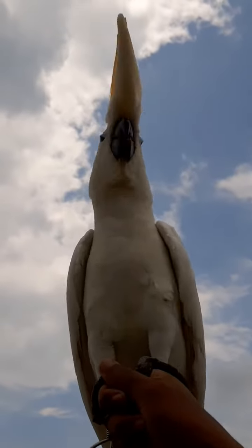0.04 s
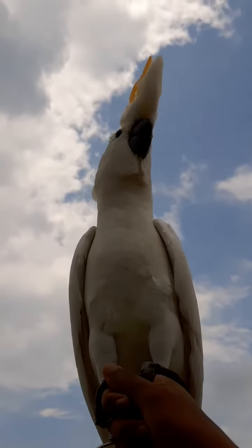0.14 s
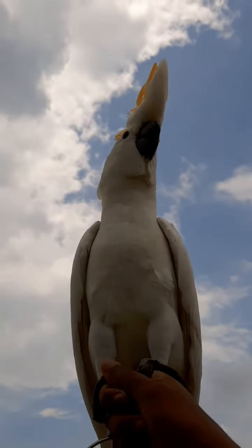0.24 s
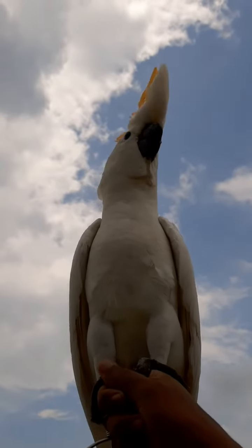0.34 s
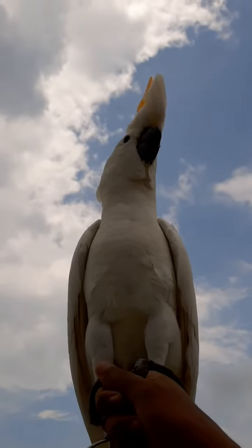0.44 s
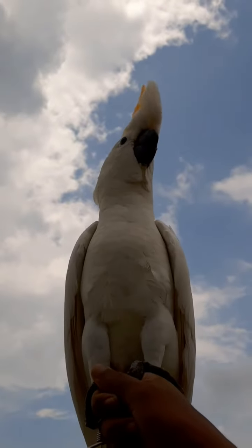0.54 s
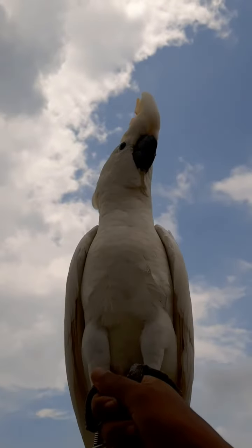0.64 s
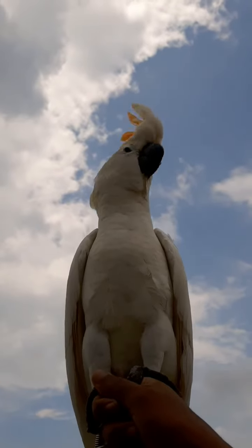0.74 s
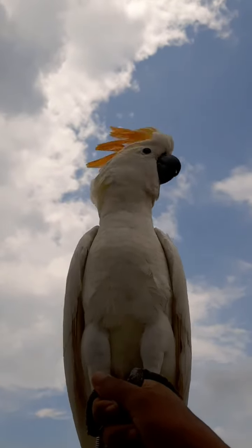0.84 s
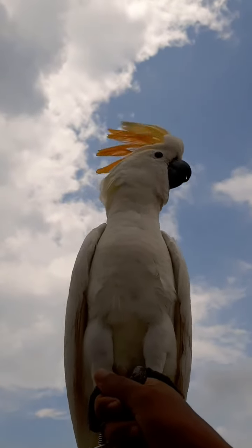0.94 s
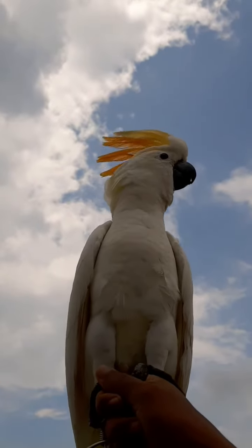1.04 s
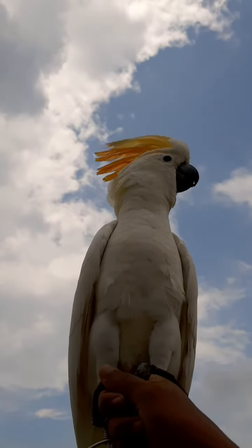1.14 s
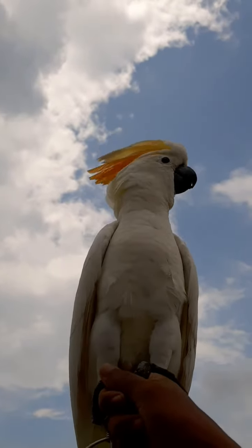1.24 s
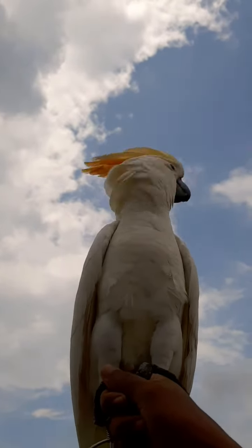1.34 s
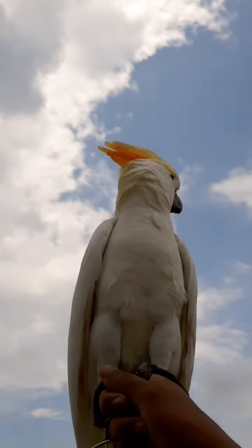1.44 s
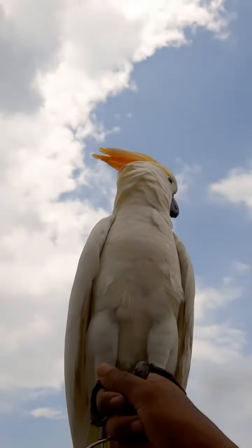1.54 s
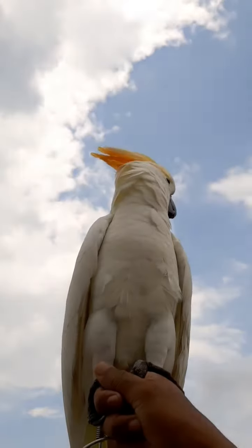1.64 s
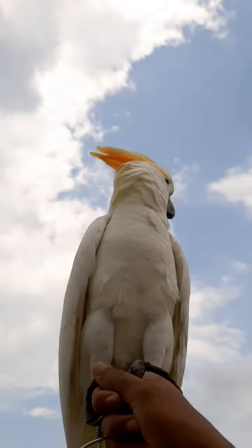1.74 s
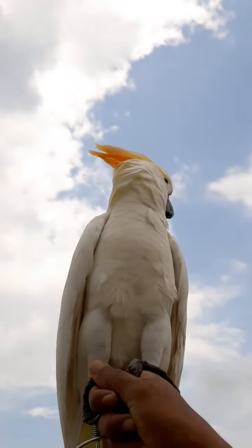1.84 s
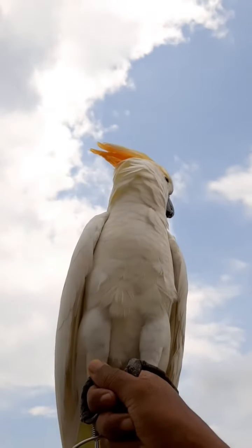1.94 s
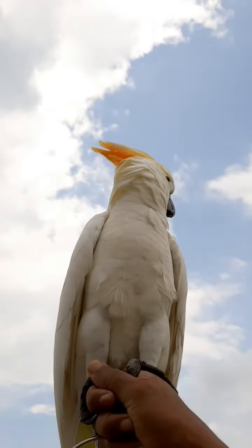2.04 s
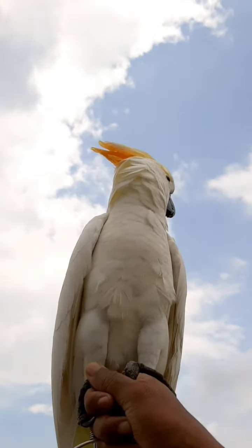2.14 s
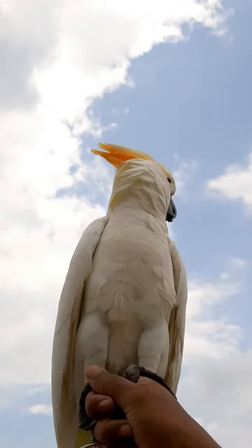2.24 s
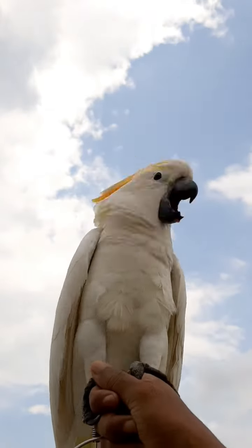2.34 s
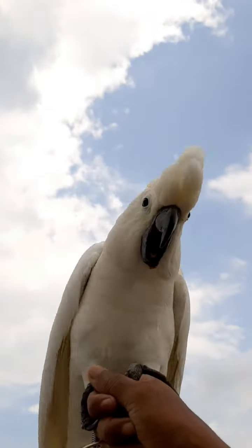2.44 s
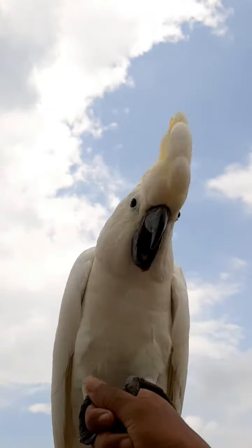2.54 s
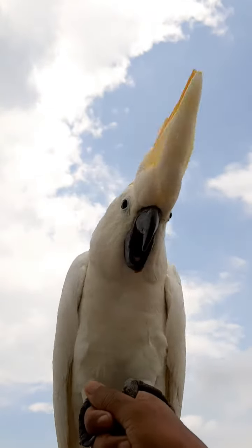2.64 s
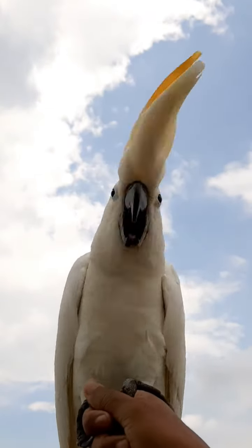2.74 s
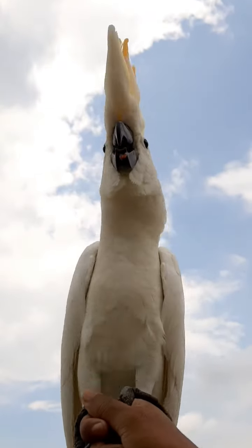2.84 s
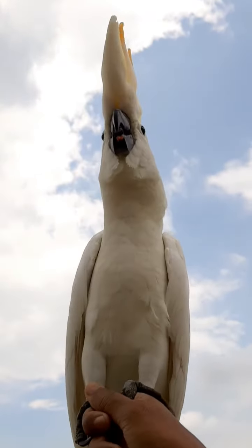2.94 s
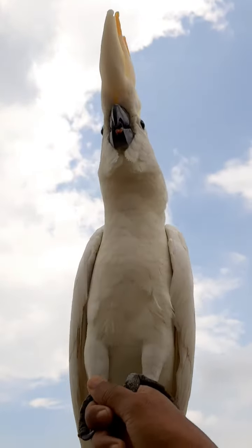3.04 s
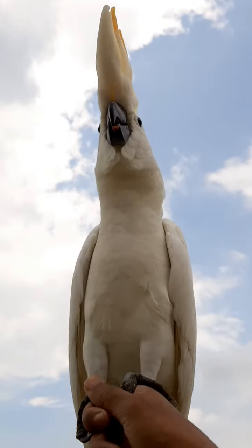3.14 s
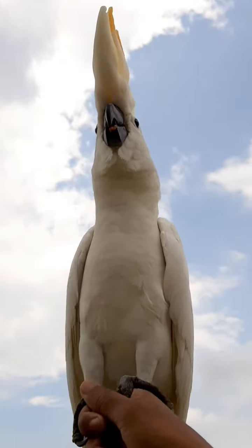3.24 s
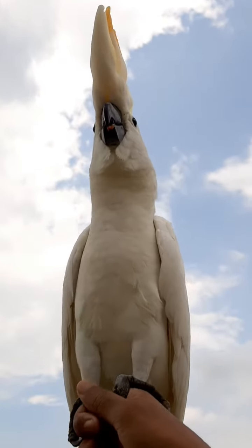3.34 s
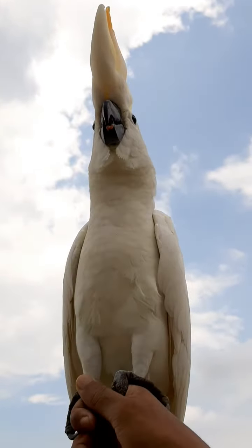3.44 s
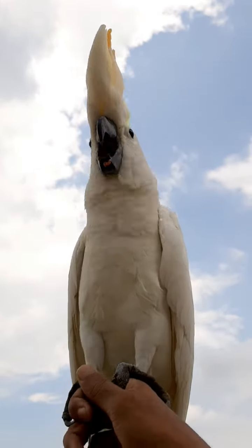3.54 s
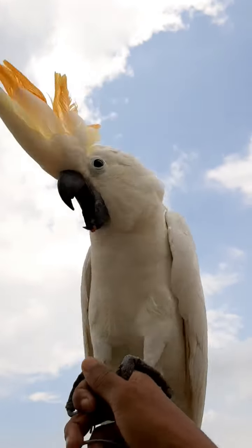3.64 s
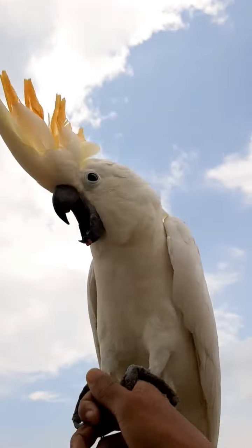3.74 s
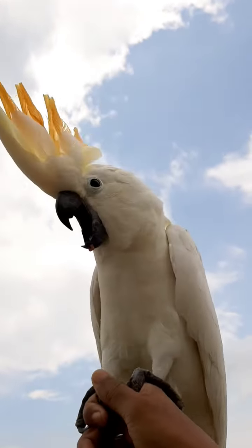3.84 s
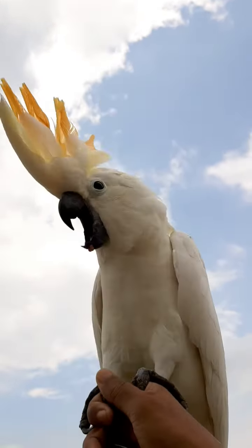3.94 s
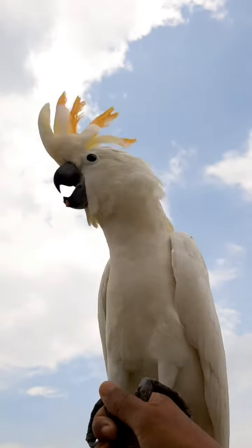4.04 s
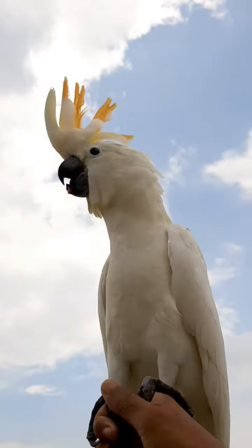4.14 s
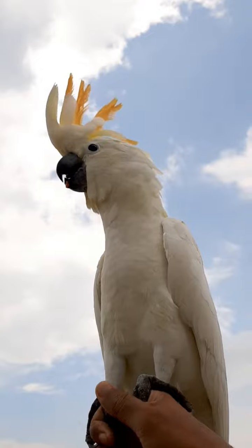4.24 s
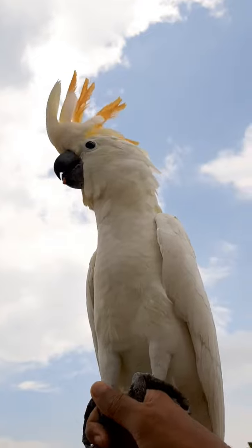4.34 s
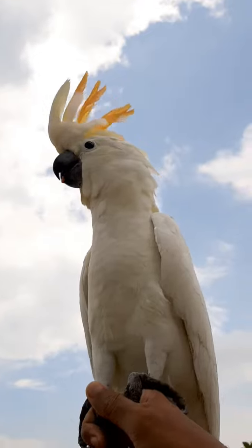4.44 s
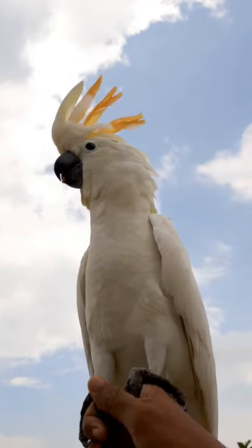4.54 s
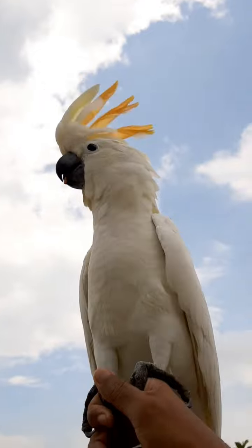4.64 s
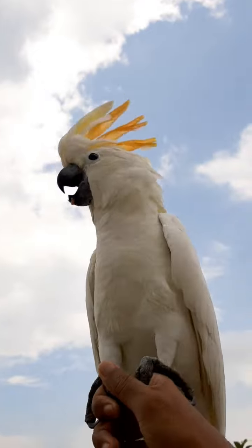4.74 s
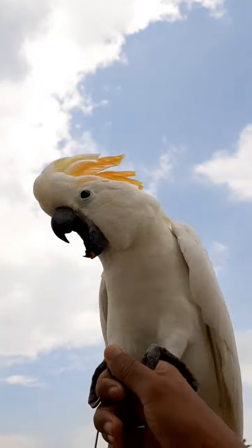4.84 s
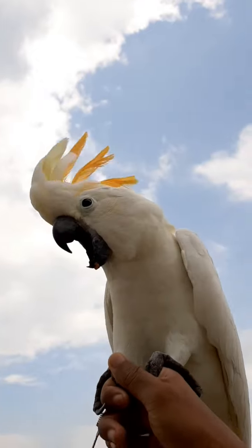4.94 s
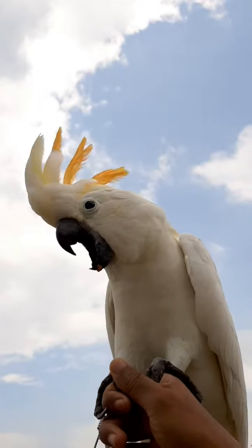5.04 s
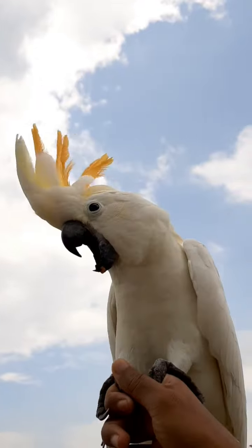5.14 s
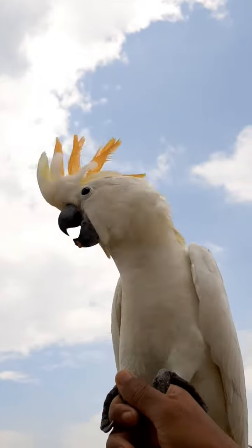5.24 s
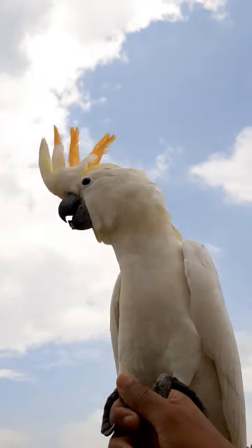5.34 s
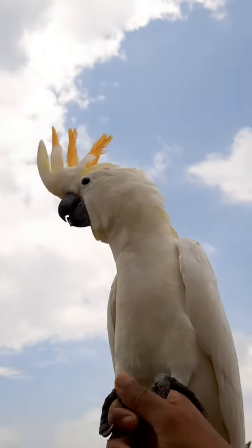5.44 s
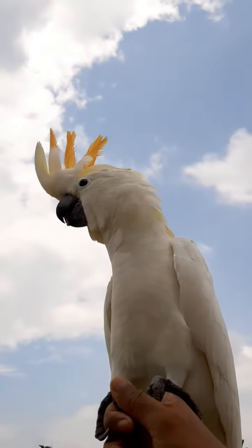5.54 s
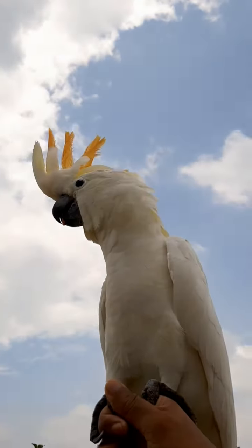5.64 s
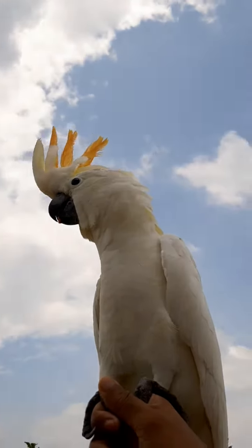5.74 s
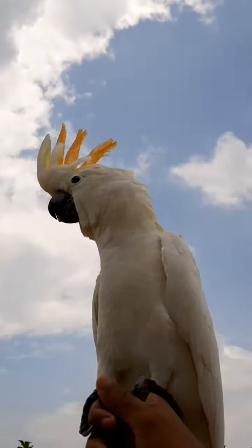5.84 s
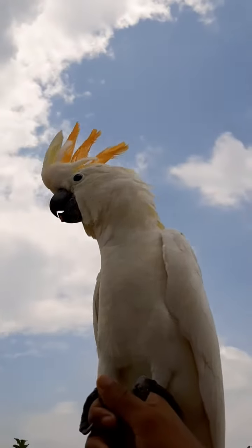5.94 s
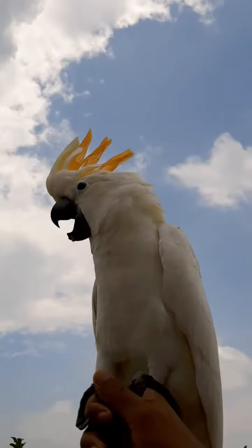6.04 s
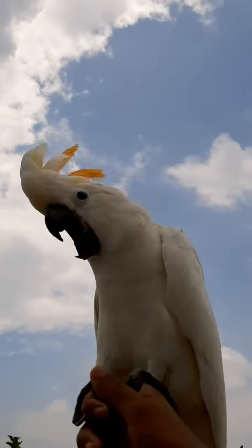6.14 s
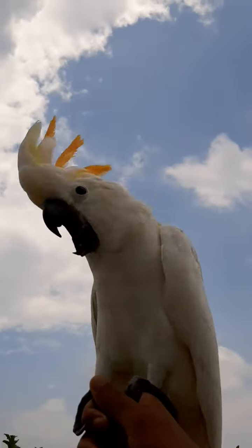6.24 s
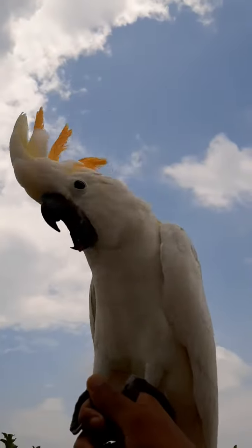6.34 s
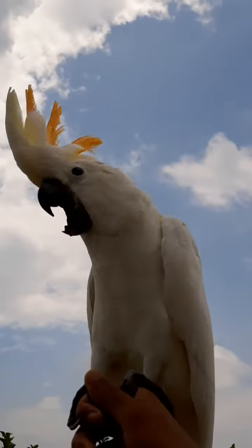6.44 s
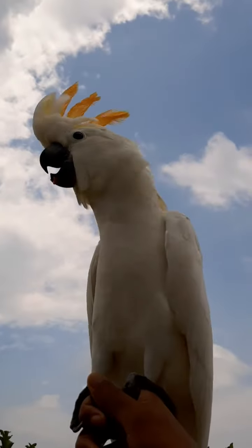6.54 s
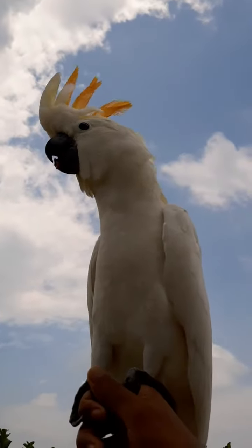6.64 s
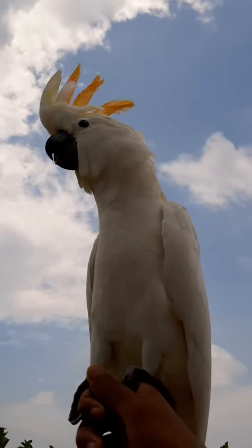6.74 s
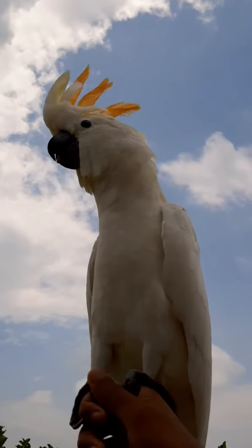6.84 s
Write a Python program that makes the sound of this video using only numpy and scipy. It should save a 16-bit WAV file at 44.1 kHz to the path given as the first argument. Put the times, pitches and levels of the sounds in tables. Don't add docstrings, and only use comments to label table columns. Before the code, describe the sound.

A cockatoo up close screams four harsh, ragged blasts at a steady pace outdoors, over faint songbirds, sparrows, a distant rooster and traffic hum.

```python
import sys
import numpy as np
from scipy import signal
from scipy.fft import rfft, irfft, next_fast_len
from scipy.io import wavfile
from scipy.ndimage import uniform_filter1d, map_coordinates

SR = 44100
rng = np.random.default_rng(int(sys.argv[2]) if len(sys.argv) > 2 else 0)


def unload_wav(signal):
    wavfile.write(
        sys.argv[1],
        SR,
        np.round(np.clip(np.atleast_2d(signal).T, -1, 1) * 32767).astype(np.int16),
    )


def makeup_ratio(level_db):
    decades = np.asarray(level_db, float) / 20
    return 10 ** decades


N = 303408

# (time [s], vehicle [dB], breeze [dB])
AIR = [(0, -65, -71.5), (.53, -64.5, -74.5), (.85, -64.5, -69.5), (1.46, -59.5, -64), (1.87, -57.5, -63),
       (2.2, -53.5, -61), (2.45, -52.5, -54), (3.05, -66.5, -61), (3.3, -61, -65), (3.66, -63, -64.5),
       (4.3, -62.5, -68.5), (4.65, -64.5, -70), (4.9, -66.5, -68.5), (5.5, -66, -66.5),
       (5.75, -64.5, -68.5), (6.14, -64.5, -70.5), (6.7, -65, -62), (6.88, -65, -76)]
# (frequency [Hz], density [dB per Hz])
HUM = [(15, -77.5), (25, -52), (57, 2.5), (81, 2.5), (162, -6.5), (195, -17), (350, -9.5), (460, -6.5),
       (770, -120)]
DRONE = [(150, -7), (250, -7.5), (564, -7), (632, -5.5), (728, -6), (1990, -12.5), (2400, -22.5),
         (3120, -53.5), (5280, -120)]
LEAVES = [(1180, -23.5), (2000, -10.5), (2400, -10.5), (3970, -7), (4650, -12), (6670, -16), (7460, -19),
          (8200, -28), (10700, -78.5), (18000, -120)]
HISS = [(5410, -51), (9200, -3.5), (10200, -5), (11700, 0.5), (13000, -9)]
# (frequency [Hz], left-right likeness [0-1])
ALIKE = [(60, 0.95), (130, 0.96), (280, 0.92), (610, 0.9), (1330, 0.016), (2870, 0.012), (6230, 0.65),
         (13500, 0.02)]
# (frequency [Hz], t60 [s])
YARD = [(300, 0.24), (2500, 0.21), (10000, 0.11)]
TREES = [(500, 0.1), (8000, 0.24)]
FIELD = [(300, .3), (3000, .9), (10000, 0.17)]
# (time [s], length [s], level [dB], from [Hz], to [Hz])
SONG = [(0, 0.23, -63, 7500, 7190), (.425, 0.22, -63, 7630, 7410), (.57, 0.28, -65.5, 7470, 7280),
        (1.18, 0.51, -69.5, 7420, 7320), (2.19, 0.11, -54.5, 7170, 6700), (2.33, 0.18, -58.5, 6970, 6770),
        (2.89, 0.12, -65, 8130, 7550), (3.03, 0.19, -64.5, 7550, 7230), (3.2, 0.21, -62.5, 7430, 7370),
        (3.4, .31, -61, 7370, 7270), (4.22, 0.27, -69, 7720, 7420), (4.39, 0.33, -67.5, 7450, 7240),
        (4.7, 0.33, -63.5, 7600, 6990), (5.4, 0.13, -68, 7540, 7470), (5.59, 0.23, -68.5, 7417, 7200),
        (5.77, 0.13, -68, 7080, 6940), (5.82, 0.21, -69.5, 7550, 7400), (5.99, 0.29, -64.5, 7310, 7370),
        (6.65, 0.21, -70, 7620, 7320)]
PIPIT = [
    (.22, 0.18, -73.5, 7870, 7840),
    (.83, .09, -76, 8000, 8080),
    (1.19, 0.37, -72.5, 8240, 8080),
]
THRUSH = [
    (0, 0.45, -83, 4510, 4200),
    (.68, 0.17, -79.5, 3060, 3100),
    (1.17, .43, -69, 3910, 4080),
    (5.44, 0.32, -67.5, 4310, 4310),
    (5.9, 0.21, -66, 4260, 4300),
    (6.1, 0.12, -58, 3130, 3540),
]
FINCH = [
    (1.16, .16, -69, 5300, 5300),
    (5.6, .28, -75, 3450, 3450),
    (5.92, .17, -70, 3450, 3250),
    (5.82, .2, -77, 5000, 5000),
]
ROOSTER = [
    (1.01, 0.057, -72, 675, 660),
    (1.31, 0.056, -69, 673, 674),
    (1.54, 0.32, -66, 662, 644),
    (1.84, .28, -63, 640, 614),
    (2.19, .11, -72, 628, 610),
    (3.07, .34, -75, 776, 715),
    (3.41, 0.075, -71.5, 674, 676),
]
# (time [s], peak [dB], top pitch [Hz])
CHIRPS = [(0.3684, -60, 3900), (0.515, -61, 3700), (0.7861, -57, 3830), (0.915, -56, 3870),
          (1.195, -57, 3730), (1.3339, -54, 4030), (1.6, -52, 3890), (1.75, -50, 3950), (2.028, -50, 3800),
          (2.165, -50, 3830), (2.425, -50, 3700)]
# (time [s], peak [dB], knock [dB], tick [dB])
CLICKS = [(0.632, -25, 6.5, -37), (1.024, -37, 5, -34), (2.468, -20, -15, -55), (2.486, -11.5, -25, -34),
          (3.712, -24, -22, -18), (4.755, -48, -18, 12.5), (4.87, -52, -21, 15), (4.937, -30, -17, -38),
          (4.943, -35, -20.5, -65), (5.6, -43.5, 1, 5), (6.186, -34, 4, -21)]
# (time [s], length [s], level [dB], attack [s], clean lead [s])
SCREAMS = [
    (2.488, 0.39, -18.5, 0.01, .075),
    (3.716, 0.39, -19.5, .035, -0.014),
    (4.942, 0.4, -19.5, 0.037, -0.0091),
    (6.194, 0.4, -20.5, 0.049, -.01),
]
# (time [s], pitch [Hz])
TREMOR = [
    [(2.49, 1332), (2.515, 1448), (2.62, 1540), (2.64, 1320), (2.68, 1530), (2.725, 1340), (2.76, 1570),
     (2.817, 1383), (2.88, 1454)],
    [(3.745, 1503), (3.775, 1387), (3.822, 1688), (3.868, 1335), (3.905, 1670), (3.945, 1342),
     (3.995, 1570), (4.045, 1337), (4.07, 1485)],
    [(4.94, 1358), (4.975, 1511), (5.03, 1397), (5.062, 1665), (5.112, 1333), (5.152, 1665), (5.189, 1352),
     (5.235, 1570), (5.287, 1335)],
    [(6.2, 1340), (6.24, 1456), (6.264, 1362), (6.318, 1585), (6.362, 1338), (6.395, 1640), (6.443, 1330),
     (6.483, 1648), (6.525, 1410)],
]
SWELL_DB = [8, 8, 9, 8, 4]
# (frequency [Hz], level [dB])
LEFT = [(300, -36), (750, -13.5), (1500, -14.5), (1900, -11.5), (2300, -8.5), (2900, -7), (3500, -3),
        (4000, -12), (4600, -15), (5800, -13), (6400, -15.5), (7200, -21), (8700, -36.5), (13000, -25.5)]
RIGHT = [(300, -22.5), (750, -15), (1500, -14.5), (1900, -10), (2300, -2.5), (2900, 0), (3500, -1.5),
         (4000, -13), (4600, -27), (5300, -12), (6000, -8), (6500, -21.5), (7000, -28.5), (7900, -48),
         (8800, -61.5), (9500, -30.5), (13000, -25.5)]
# (frequency [Hz], phase [radians])
LEAD = [(1000, 0), (1900, .4), (2400, 1.9), (3400, 3.14), (4100, 3.3), (4900, 6.3), (5600, 9.5),
        (6200, 9.5), (13000, 17)]
# (centre [Hz], width [Hz], gain [dB])
WINDPIPE = (2750, 220, 10)
# (centre [Hz], width [Hz], gain [dB])
BEAK = [(3950, 530, 8), (5100, 290, 8.5), (6026, 300, 2), (6740, 260, 6.5)]
# (frequency [Hz], level re voice [dB])
SWIRL = [(700, -16), (1500, 5.5), (2200, 1), (3000, 0), (3480, -13.5), (3900, -1), (5700, -4), (8000, 8.5)]
# (frequency [Hz], level [dB])
BREATH = [(25, -29.5), (60, 5.5), (200, 0.5), (500, -5.5), (1000, -10), (2000, -30)]

FAR_DB = -65
HUM_DB, HISS_DB = -66.5, -15
HUM_GROWS, HISS_GROWS = 0.61, 0.46
NOTE_EDGE_S = 0.018
RELEASE_S, RELEASE_DB = 0.025, 17.5
CALM, ROUGH, SPENT, CRACK = .07, .45, .22, .4
BREAK_S, SETTLE_S, CRACK_S = .06, .05, .018
BUFFET_DB, SHELTER_DB = -12, 29.5
JET_S, JET_LAG_S = 0.058, 0.013
LOUD_DB_PER_HZ, PUFF_DB_PER_HZ = 0.0076, 0.0071
REST_HZ = 1454
CLEAR_DB = 8


def unit(x):
    return x / np.sqrt(np.mean(x ** 2) + 1e-20)


def along(points, hz):
    f, v = np.transpose(points)
    return np.interp(np.log(hz + 1), np.log(f + 1), v)


def curves(rows):
    s, *cols = np.transpose(rows)
    return [np.interp(np.arange(N) / SR, s, c) for c in cols]


def ramp(t, span):
    return np.clip(t / span, 0, 1)


def wobble(rate):
    knots = rng.standard_normal(int(N * rate / SR) + 4)
    return map_coordinates(knots, [np.arange(N) * rate / SR])


def filtered(x, response):
    m = next_fast_len(N + SR // 2)
    return irfft(rfft(x, m) * response(np.fft.rfftfreq(m, 1 / SR)), m)[..., :N]


def resonance(f, centre, width, db):
    return makeup_ratio(db) * 1j * f * width / (centre * centre - f * f + 1j * f * width)


def rush(spectrum, patchy_db):
    z = signal.stft(rng.standard_normal((2, N)), nperseg=512)[2]
    patches = uniform_filter1d(rng.standard_normal(z.shape[1:]), 6, 0)
    patches = unit(uniform_filter1d(patches, 10, 1))
    pair = signal.istft(z * makeup_ratio(patchy_db * patches), nperseg=512)[1][:, :N]

    def spread(hz):
        turn = np.arccos(np.clip(along(ALIKE, hz), -1, 1)) / 2
        return makeup_ratio(along(spectrum, hz)) * [np.cos(turn), np.sin(turn)]

    mid, side = filtered(pair, spread)
    return np.array([mid + side, mid - side]) / np.std(mid)


def echoes(x, decay, gap):
    hz, t, z = signal.stft(rng.standard_normal((2, SR // 2)), SR, nperseg=128)
    fade = makeup_ratio(-60 * t / along(decay, hz)[:, None])
    tail = signal.istft(z * fade, SR, nperseg=128)[1]
    late = np.pad(np.atleast_2d(x), ((0, 0), (round(gap * SR), 0)))
    return signal.fftconvolve(late, tail / np.linalg.norm(tail[0]), axes=1)[:, :N]


def air():
    drone_db, leaves_db = curves(AIR)
    hum_db = HUM_DB + HUM_GROWS * (drone_db - FAR_DB) + 2.2 * wobble(3.2)
    hiss_db = FAR_DB + HISS_DB + HISS_GROWS * (leaves_db - FAR_DB) + 2.2 * wobble(3)
    hum = makeup_ratio(hum_db) * rush(HUM, patchy_db=0.0)
    drone = makeup_ratio(drone_db + 1.2 * wobble(4)) * rush(DRONE, patchy_db=2.0)
    leaves = makeup_ratio(leaves_db) * rush(LEAVES, patchy_db=4.0)
    hiss = makeup_ratio(hiss_db) * rush(HISS, patchy_db=2.5)
    return hum + drone + makeup_ratio([[-1.5], [1.1]]) * (leaves + hiss)


def whistle(notes, waver, overtone_db, fade_db=4):
    out = np.zeros(N + SR)
    stray = 1 + waver * np.pad(wobble(150), (0, SR))
    for s, length, db, from_hz, to_hz in notes:
        at = round(s * SR)
        t = np.arange(round(length * SR)) / SR
        pitch_hz = (from_hz + (to_hz - from_hz) * t / length) * stray[at:][:len(t)]
        turn = 2 * np.pi * np.cumsum(pitch_hz) / SR
        edges = ramp(t, NOTE_EDGE_S) * ramp(length - t, NOTE_EDGE_S)
        size = edges * makeup_ratio(db + 11.0 - fade_db * t / length)
        out[at:][:len(t)] += size * (np.sin(turn) + makeup_ratio(overtone_db) * np.sin(2 * turn))
    return out[:N]


def sparrows():
    u, out = np.linspace(0, 1, 1700), np.zeros(N)
    for s, db, hz in CHIRPS:
        arch_hz = hz * (.78 + .28 * np.sin(np.pi * u ** .85))
        tone = np.sin(2 * np.pi * np.cumsum(arch_hz) / SR)
        out[round(s * SR):][:len(u)] += makeup_ratio(db - 5.5) * np.sin(np.pi * u) ** .6 * tone
    return out


def far_birds():
    song = whistle(SONG, waver=.022, overtone_db=-60)
    song += whistle(PIPIT, waver=.015, overtone_db=-60)
    song += whistle(THRUSH, waver=.035, overtone_db=-40)
    song += whistle(FINCH, waver=.03, overtone_db=-40)
    crow = whistle(ROOSTER, waver=.003, overtone_db=-12, fade_db=1)
    chirps = sparrows()
    direct = makeup_ratio([[-6], [-3]]) * song + 1.19 * crow + chirps * makeup_ratio([[-1.5], [3]])
    return direct + echoes(.7 * song + .5 * crow + .25 * chirps, TREES, gap=.003)


def clicks():
    out, t = np.zeros((2, N + SR)), np.arange(900) / SR
    for s, db, knock_db, tick_db in CLICKS:
        grit = uniform_filter1d(rng.standard_normal((2, len(t))), size=4)
        crack = 0.73 * makeup_ratio(-60 * t / 0.0025) * grit
        knock = makeup_ratio(knock_db + 0.5 - 60 * t / 0.0014) * np.sin(2 * np.pi * 900 * t)
        shimmer = uniform_filter1d(rng.normal(0, 2.5, (2, len(t))), size=8)
        tick = makeup_ratio(tick_db - 1.5 - 60 * t / 0.0032) * np.sin(2 * np.pi * 11500 * t) * shimmer
        out[:, round(s * SR):][:, :len(t)] += makeup_ratio(db) * (crack + knock + tick)
    return out[:, :N]


def lungs():
    t = np.arange(N) / SR
    starts = [row[0] - .1 for row in SCREAMS]
    current = np.maximum(np.searchsorted(starts, t) - 1, 0)
    s, length, db, attack, clean = np.array(SCREAMS)[current].T
    since, left = t - s, s + length - t
    gate = ramp(since, attack) * ramp(left + 0.0027, 0.012)
    level_db = db - RELEASE_DB * (1 - ramp(left, RELEASE_S))
    jet = ramp(since - JET_LAG_S - clean / 3, JET_S) * ramp(left + JET_S, 2 * JET_S)
    full = SPENT + (ROUGH - SPENT) * ramp(left - RELEASE_S, SETTLE_S)
    burst = CRACK * np.exp(-(np.abs(since) / CRACK_S) ** 2)
    chaos = CALM + (full - CALM) * ramp(since - clean, BREAK_S) + burst
    return gate, level_db, BUFFET_DB - SHELTER_DB * (1 - jet), chaos


def syrinx(pitch_hz, chaos):
    half = .48 - .4 * chaos
    stray = chaos * (.028 * wobble(120) + .035 * wobble(600))
    turn = np.pi * np.cumsum(pitch_hz * (1 + stray)) / SR
    swell = [makeup_ratio((chaos + .1) * db * wobble(55)) for db in SWELL_DB]
    pulses = np.zeros(N)
    for k in range(1, 19):
        share = half * min(k + 1, 7) / 6 if k % 2 else 1
        pulses += share * swell[k % 5] * np.cos(k * turn + .12 * k * k)
    flap = np.cos(2 * np.pi * np.cumsum(290 * (1 + 0.17 * wobble(30))) / SR)
    pulses *= 1 + 1.1 * chaos * flap * np.clip(0.87 + .5 * wobble(25), 0, 1)
    return pulses, turn


def breath_puffs():
    lumps = makeup_ratio([2.4 * wobble(45) + 2.9 * wobble(200) for _ in range(2)])
    rumble = filtered(rng.standard_normal((2, N)), lambda hz: makeup_ratio(along(BREATH, hz)))
    return unit(lumps * rumble)


def cockatoo():
    gate, level_db, buffet_db, chaos = lungs()
    pitch_hz = uniform_filter1d(curves(sum(TREMOR, []))[0], size=350)
    slack_hz = REST_HZ - pitch_hz
    level_db = level_db + LOUD_DB_PER_HZ * slack_hz + CLEAR_DB * (ROUGH - chaos)
    effort = gate * makeup_ratio(level_db + 12.5)
    pulses, turn = syrinx(pitch_hz, chaos)
    rasp = (1.1 + np.cos(2 * turn)) * rng.standard_normal((3, N)) * chaos * makeup_ratio(1.3 * wobble(40))
    throat = filtered(rasp[0], lambda hz: 1 + resonance(hz, *WINDPIPE))
    voice = effort * (0.37 * pulses + 0.43 * throat)

    def ports(hz):
        return makeup_ratio([along(LEFT, hz), along(RIGHT, hz)])

    def lead(hz):
        return np.exp(.5j * np.outer([1, -1], along(LEAD, hz)))

    def beak(hz):
        return 1 + sum(resonance(hz, *cavity) for cavity in BEAK)

    direct = filtered(voice, lambda hz: ports(hz) * lead(hz))
    eddies = filtered(effort * rasp[1:], lambda hz: ports(hz) * makeup_ratio(along(SWIRL, hz)) * beak(hz))
    port_db = np.array([[5.5], [-1.5]])
    buffet = gate * makeup_ratio(level_db + buffet_db + PUFF_DB_PER_HZ * slack_hz + port_db) * breath_puffs()
    away = direct[0] + 1.8 * eddies
    near = makeup_ratio(-19) * echoes(away, YARD, gap=.015)
    far = makeup_ratio(-42.5) * echoes(away, FIELD, gap=0.09)
    return direct + eddies + buffet + near + far


def scene():
    return air() + far_birds() + clicks() + cockatoo()


def masked(x, margin_db, moody_db):
    hz, _, z = signal.stft([x[0] + x[1], x[0] - x[1]], SR, nperseg=2048)
    power = np.abs(z) ** 2
    band = uniform_filter1d(power, size=8, axis=1)[:, 4::8]
    around = uniform_filter1d(power.max(0), size=56, axis=0)[4::8]
    mood = unit(uniform_filter1d(rng.standard_normal(band.shape), size=3, axis=2))
    kept = band > makeup_ratio(2 * (margin_db + moody_db * mood)) * around
    kept[1, 43:] = kept[0, 43:]
    z[:, :-1] *= np.repeat(kept, 8, axis=1) | (hz[:-1, None] < 1800)
    mid, side = signal.istft(z, SR, nperseg=2048)[1][:, :N] / 2
    return np.array([mid + side, mid - side])


def band_limit(x):
    return signal.sosfilt(signal.butter(12, 14110, fs=SR, output="sos"), x)


def record(dry):
    soft = dry / (1 + np.abs(dry / .62) ** 4) ** .25

    def pass_band(hz):
        treble_cut = makeup_ratio(-np.clip(hz - 12950, 0, 600) / 5)
        return treble_cut * hz ** 2 / (hz ** 2 + 30 ** 2)

    limited = filtered(soft, pass_band)
    mix = masked(limited, margin_db=-9.5, moody_db=4.5)
    return band_limit(mix)


dry = scene()
out = record(dry)
unload_wav(out)
```